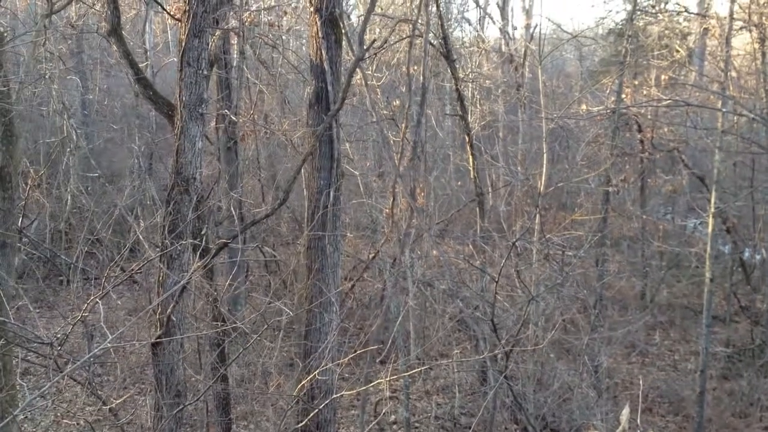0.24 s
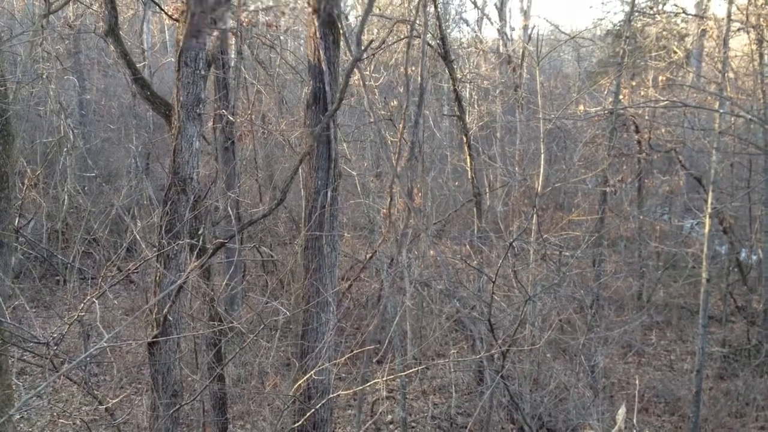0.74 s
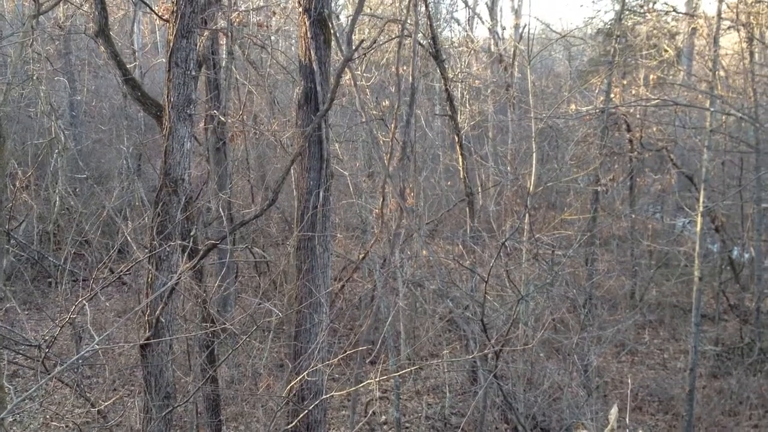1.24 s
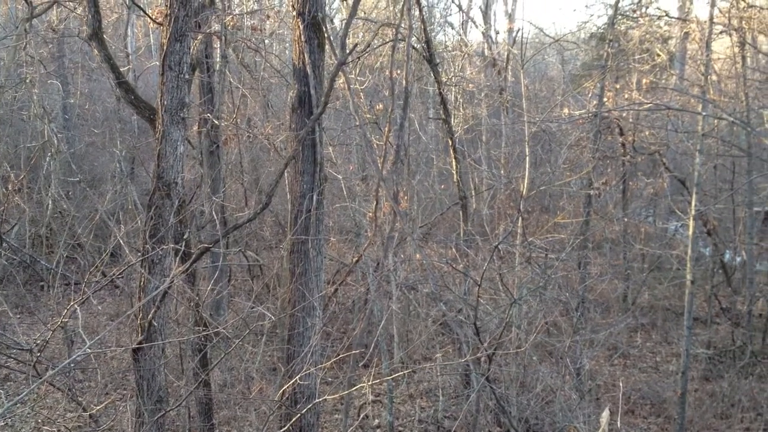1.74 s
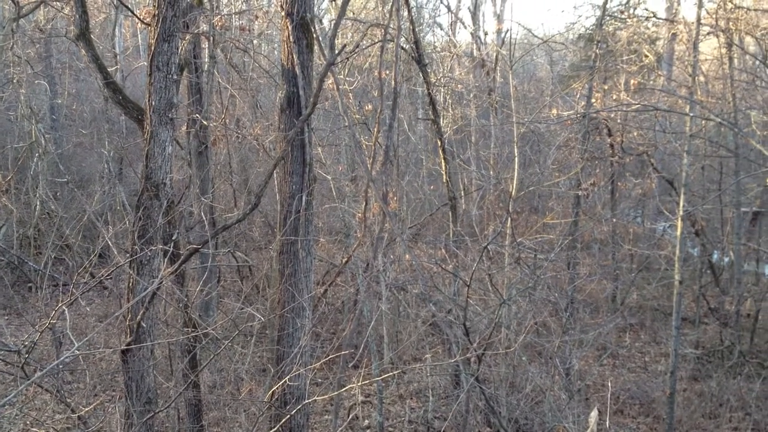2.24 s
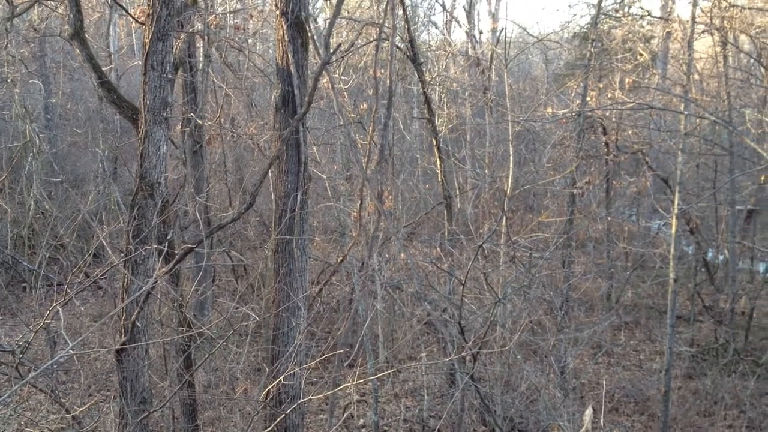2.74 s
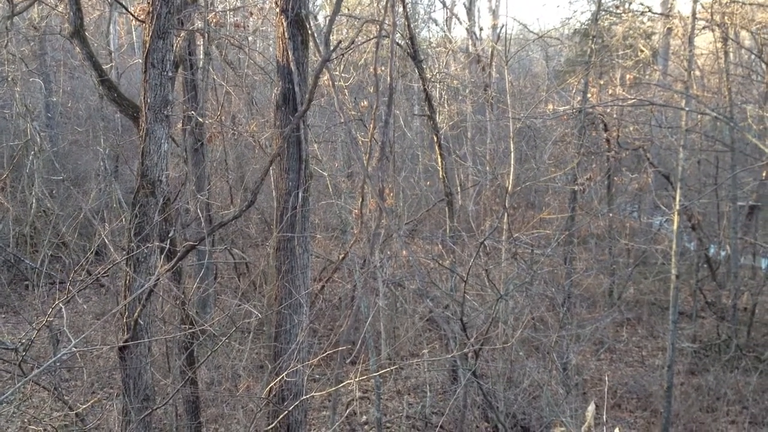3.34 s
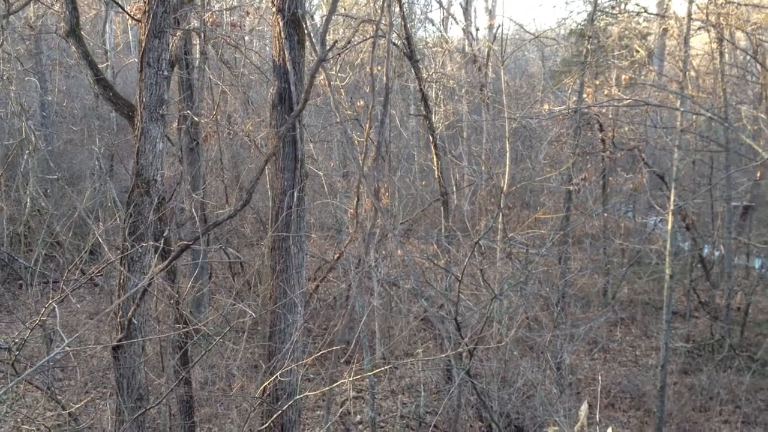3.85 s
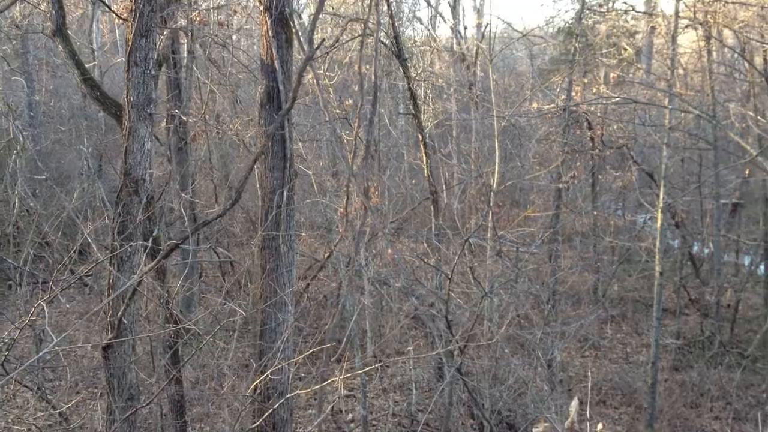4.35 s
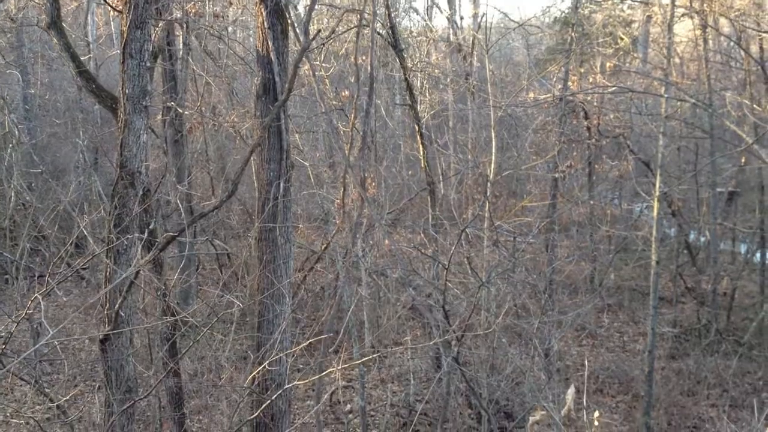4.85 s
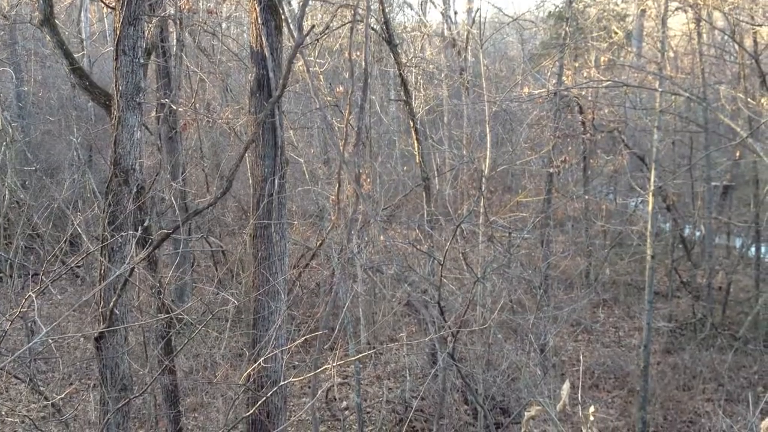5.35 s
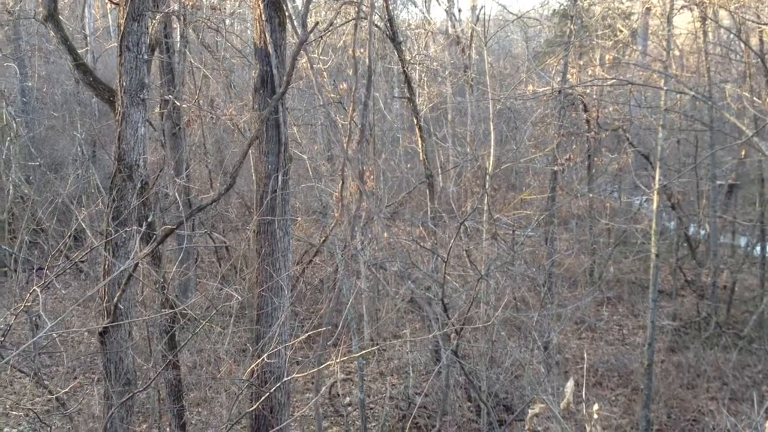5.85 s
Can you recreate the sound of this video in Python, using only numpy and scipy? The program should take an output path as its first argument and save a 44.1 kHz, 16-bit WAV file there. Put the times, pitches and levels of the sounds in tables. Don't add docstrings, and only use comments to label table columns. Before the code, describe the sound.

Outdoors in bare woods, a hound at some distance is mid-bay as the sound opens, its hoot loudest right at 0 seconds. Seven more bays follow at about 0.7, 1.4, 2.2, 2.8, 3.5, 4.2 and 5.0 seconds, each lasting roughly 0.2 seconds. Every cry begins with slight hoarse air and a quick bright upward scoop near 460 hertz, jumps to a rounder hoot near 520, then slackens, often dropping in pitch. The 2.8 bay is weak and low; the 3.5 one is highest and strong. Diffuse echoes off the trunks linger over a second, filling the gaps. Tiny high bird chips sound at 0.1, 0.5 and faintly 1.8 seconds, with another at 5.6. A dry twig ticks softly at 3.3. Faint traffic hum, gently swelling, and steady microphone hiss continue throughout, left exposed as the final echo fades by 6 seconds.

```python
import sys
import numpy as np
from scipy import signal
from scipy.fft import rfft, irfft, next_fast_len
from scipy.io import wavfile
from scipy.ndimage import uniform_filter1d

SR = 44100
rng = np.random.default_rng(int(sys.argv[2]) if len(sys.argv) > 2 else 0)


def wrap_up_sound(samples):
    columns = np.atleast_2d(samples).T
    tamed = np.clip(columns, -1, 1)
    steps = np.round(tamed * 32767).astype(np.int16)
    wavfile.write(sys.argv[1], SR, steps)


def volts_from_decibels(level):
    exponent = np.asarray(level, float) / 20
    return 10 ** exponent


N = 268128
LEAD = SR // 4


def rms_one(x):
    return x / np.sqrt(np.mean(x ** 2) + 1e-20)


def at_hz(points, hz):
    table_hz, value = np.transpose(points)
    return np.interp(np.log(np.maximum(hz, 1)), np.log(table_hz), value)


def band_pass(x, order, low_hz, high_hz):
    return signal.sosfilt(signal.butter(order, [low_hz, high_hz], "band", fs=SR, output="sos"), x)


def wobble(rate_hz):
    low_pass = signal.butter(2, rate_hz, fs=SR, output="sos")
    return rms_one(signal.sosfilt(low_pass, rng.standard_normal(N + LEAD)))


def coloured_noise(spectrum):
    size = next_fast_len(N)
    gain = volts_from_decibels(at_hz(spectrum, np.fft.rfftfreq(size, 1 / SR)))
    return rms_one(irfft(gain * rfft(rng.standard_normal(size)), size)[:N])


# start_s, scoop_s, pitch_hz, level_db, upper_partials_db
OPEN_STARTS = [
    (-.12, 0.014, 474, -40, -20.5),
    (0.674, 0.013, 461.8, -37, -21),
    (1.402, 0.048, 462.5, -39.5, -13),
    (2.16, 0.032, 451.5, -38.5, -19.5),
    (2.83, .022, 431.3, -48.5, -16),
    (3.545, 0.036, 491.3, -37.5, -15.5),
    (4.231, .055, 468.2, -40, -17.5),
    (4.956, 0.015, 461, -38.5, -19),
]
# fundamental_db, upper_drift_db, fundamental_drift_db
OPEN_COLOURS = [(2.5, -4, 1), (-1.5, -7, 7.5), (-0.7, -0.5, 8), (-5, 2.5, 2), (9, -9, -9), (5, 4, -3.5),
                (6, 7, 8), (0, 1, 6)]
# share_of_open_part, fundamental_db, octave_db, upper_db, half_line_db
OPEN_JAWS = [(0, -36.5, -22, -15, -7.5), (.25, -12.5, -10.5, -1.5, -34), (.62, -5, -7, -1, -47.5),
             (.97, -12.5, 1.5, -4, -43)]
# jaws_close_s, pitch_hz, level_db, overtones_db, half_line_db
CLOSED_HOOTS = [
    (-.055, 527, -29, 5.5, -12),
    (0.737, 522.7, -34, 5.5, 2.5),
    (1.47, 515.6, -38.5, 6.5, 5),
    (2.235, 521.4, -35.5, 12, 0),
    (2.926, 495.8, -59, 30, 27.5),
    (3.624, 536.3, -31, 5, 7.5),
    (4.323, 522.8, -32.5, -2, -5.5),
    (5.027, 519.4, -33.5, 1, -20.5),
]
# share_of_hoot, fundamental_db, octave_db, upper_db, half_line_db
CLOSED_JAWS = [(-.15, -3.5, -19, -36.5, -45), (.2, 2, -38.5, -47, -30), (.75, -1, -21.5, -51, -24.5),
               (0.998, -1, -29.5, -41.5, -28)]
# give_s, last_pitch_hz, halfway_level_db, fade_over_hoot_db
VOICE_FALLS = [
    (.04, 500.1, -45.5, -9),
    (.815, 303, -46.5, -2),
    (1.556, 337.7, -49, -2.5),
    (2.308, 308, -47, -6),
    (2.99, 389.2, -57.5, -5),
    (3.711, 523.7, -40, -13),
    (4.402, 367.6, -54.5, -0.5),
    (5.11, 292, -46, -3),
]
# fundamental_db, octave_db, upper_db, half_line_db
FALL_PARTIALS_DB = [-4.4, -13, -28.5, -13]
SCOOP_SHARE, SCOOP_HALFWAY, REST_HZ = .76, .93, 453.3
JUMP_S, HOOT_SAG = .026, .98
FALL_S, FALL_HALFWAY, FALL_FADE_DB = .056, .6, 3


def bay_stages():
    pitch, levels = [], []
    for opening, colour, hoot, fall in zip(OPEN_STARTS, OPEN_COLOURS, CLOSED_HOOTS, VOICE_FALLS):
        start_s, scoop_s, open_hz, open_db, upper_db = opening
        chest_db, upper_drift_db, chest_drift_db = colour
        close_s, hoot_hz, hoot_db, over_db, half_db = hoot
        give_s, last_hz, fall_db, fading_db = fall
        top_s, held_hz = close_s + JUMP_S, HOOT_SAG * hoot_hz

        pitch += [(start_s, SCOOP_SHARE * open_hz),
                  (start_s + scoop_s / 2, SCOOP_HALFWAY * open_hz),
                  (start_s + scoop_s, open_hz),
                  (close_s, REST_HZ),
                  (top_s, hoot_hz),
                  (give_s, held_hz),
                  (give_s + FALL_S / 2, held_hz + FALL_HALFWAY * (last_hz - held_hz)),
                  (give_s + FALL_S, last_hz)]

        drift_db = np.array([chest_drift_db, 0, upper_drift_db, 0])
        open_db = open_db + np.array([chest_db, 0, upper_db, 0])
        for share, *db in OPEN_JAWS:
            row_db = open_db + db + (share - .5) * drift_db
            levels.append((start_s + share * (close_s - start_s), *row_db))
        hoot_db = hoot_db + np.array([0, over_db, over_db, half_db])
        for share, *db in CLOSED_JAWS:
            row_db = hoot_db + db + share * fading_db
            levels.append((top_s + share * (give_s - top_s), *row_db))
        fall_db = fall_db + np.array(FALL_PARTIALS_DB)
        levels.append((give_s + FALL_S / 2, *fall_db))
        levels.append((give_s + FALL_S, *(fall_db - FALL_FADE_DB)))
    return np.array(pitch), np.array(levels)


# freq_hz, gain_db
THROAT_GAIN = [(1100, 17), (1400, 2), (1800, -4), (1950, 1), (2120, -3), (2300, -4), (2450, -12),
               (2900, -44)]
RASP_DB, JITTER = -31, .0055
GLIDE_LOSS_DB = 1.1
LOW_LOSS_DB = 22


def hound():
    pitch, rows = bay_stages()
    t = (np.arange(N + LEAD) - LEAD) / SR
    row_s = rows[:, 0]
    pitch_hz = np.interp(t, *pitch.T)
    first_db, octave_db, upper_db, half_db = [np.interp(t, row_s, column) for column in rows.T[1:]]

    rising = uniform_filter1d(np.maximum(np.gradient(np.log(pitch_hz)) * SR, 0), size=400)
    octave_db = octave_db - GLIDE_LOSS_DB * rising
    upper_db = upper_db - GLIDE_LOSS_DB * rising
    slack_db = -LOW_LOSS_DB * np.maximum(np.log2(440 / pitch_hz), 0)

    after = np.clip(np.searchsorted(row_s, t), 1, len(rows) - 1)
    voiced = (np.diff(row_s)[after - 1] < .25) & (t > row_s[0]) & (t < row_s[-1])
    gate = uniform_filter1d(voiced * 1., size=700)

    phase = 2 * np.pi * np.cumsum(pitch_hz * (1 + JITTER * wobble(60.8))) / SR
    voice = volts_from_decibels(first_db) * np.sin(phase) + volts_from_decibels(octave_db) * np.sin(2 * phase + 1)
    for multiple in range(3, 7):
        partial_db = upper_db + at_hz(THROAT_GAIN, multiple * pitch_hz) + 2.5 * wobble(40)
        voice += volts_from_decibels(partial_db) * np.sin(multiple * phase)
    voice += volts_from_decibels(half_db + 4 * wobble(40)) * np.sin(3 / 2 * phase + .9 * wobble(45))

    puffs = rng.standard_normal(N + LEAD) * (1 + np.cos(phase))
    rasp = rms_one(band_pass(puffs, 4, 600, 1700))
    voice += volts_from_decibels(np.maximum(first_db, octave_db) + RASP_DB) * rasp
    return np.sqrt(2) * volts_from_decibels(slack_db) * voice * gate


HOARSE_AIR_DB = [-36, -36, -28, -36, -20, -40, -24.5, -27]
HOARSE_EARLY_S, HOARSE_RISE_S, HOARSE_FADE_S = .021, .0089, .032


def hoarse_start():
    t, level = (np.arange(N + LEAD) - LEAD) / SR, 0
    for (start_s, _, _, bay_db, _), below_db in zip(OPEN_STARTS, HOARSE_AIR_DB):
        since_s = np.maximum(t - start_s + HOARSE_EARLY_S, 0)
        burst = (since_s / HOARSE_RISE_S) ** 2 * np.exp(-since_s / HOARSE_FADE_S * 2)
        level = level + volts_from_decibels(bay_db + below_db) * burst
    return level * rms_one(band_pass(rng.standard_normal(N + LEAD), 4, 600, 2200))


# freq_hz, t60_s
TRUNK_T60 = [(300, 1.2), (520, 1.4), (950, 1.5), (1500, 1.5), (2400, 1.2), (7500, .3)]
# freq_hz, gain_db
TRUNK_COLOUR = [(300, -4), (420, -3), (600, -2), (950, 1.5), (1500, 2), (2400, 1), (7500, 0.5)]
WOODS_DB, WOODS_BUILD_S = -4, .0041


def woods(x):
    t = np.arange(2 * SR) / SR
    white, echoes = rng.standard_normal((2, len(t))), 0
    edges_hz = 150 * 2 ** np.arange(0, 6.6, .5)
    for k, (low_hz, high_hz) in enumerate(zip(edges_hz, edges_hz[1:])):
        build = 1 - np.exp(-t / WOODS_BUILD_S * np.sqrt(low_hz / 500))
        fade = build * volts_from_decibels(-60 * t / at_hz(TRUNK_T60, np.sqrt(low_hz * high_hz)))
        band = band_pass(white[k % 2], 2, low_hz, high_hz)
        echoes = echoes + volts_from_decibels(at_hz(TRUNK_COLOUR, low_hz)) * band * fade / np.sqrt(np.sum(fade ** 2))
    return volts_from_decibels(WOODS_DB) * signal.fftconvolve(x, echoes)[:len(x)]


# start_s, peak_db, start_hz, end_hz
BIRD_CHIPS = [
    (.0945, -54, 8050, 7350),
    (.5305, -59, 7950, 7200),
    (1.7625, -63, 8250, 7450),
    (5.577, -60, 7350, 7750),
]


def bird():
    out, t = np.zeros(N + LEAD), np.arange(SR // 20) / SR
    for start_s, peak_db, start_hz, end_hz in BIRD_CHIPS:
        pitch_hz = end_hz + (start_hz - end_hz) * np.exp(-t / .005)
        shape = (1 - np.exp(-t / .002)) * np.exp(-(t / .012) ** 2)
        i = LEAD + round(start_s * SR)
        out[i:i + len(t)] += volts_from_decibels(peak_db) * shape * np.sin(2 * np.pi * np.cumsum(pitch_hz) / SR)
    return out


# start_s, peak_db, ring_hz
TWIG_TICKS = [
    (3.317, -55, 6500),
]


def twig():
    out, t = np.zeros(N), np.arange(SR // 30) / SR
    for start_s, peak_db, ring_hz in TWIG_TICKS:
        crack = band_pass(rng.standard_normal(len(t)), 2, 3500, 14000) * np.exp(-t / .01)
        ring = np.sin(2 * np.pi * ring_hz * t) * np.exp(-t / .006)
        attack = np.minimum(t / .003, 1)
        i = round(start_s * SR)
        out[i:i + len(t)] += volts_from_decibels(peak_db) * (.6 * crack + .4 * ring) * attack
    return out


# freq_hz, density_db
TRAFFIC_SPECTRUM = [(24, -42), (40, -55), (96, -12), (160, -3.5), (288, -5), (403, -12.5), (508, -1),
                    (576, -7.5), (629, -12), (807, -12.5), (914, -9.5), (1130, -14.5), (1400, -16.5),
                    (1610, -16), (2800, -25.5), (3640, -41), (6160, -120)]
# time_s, gain_db
TRAFFIC_SWELL = [(0, -1.2), (1.2, 1), (2.4, 0.4), (3.4, -1), (4.4, 1.2), (5.3, 1.1), (5.701, -0.5),
                 (6.08, -1.5)]
TRAFFIC_DB = -62.5


def traffic():
    swell_db = np.interp(np.arange(N) / SR, *np.transpose(TRAFFIC_SWELL))
    return volts_from_decibels(TRAFFIC_DB + swell_db) * coloured_noise(TRAFFIC_SPECTRUM)


# freq_hz, density_db
HISS_SPECTRUM = [(1530, -30), (2600, 0), (2800, -1), (3060, 0), (3410, -3), (3570, -2), (4680, -2),
                 (5110, -5), (7270, -7), (9200, -10), (10200, -13), (13500, -9), (15100, -8)]
HISS_DB = -69.5


def microphone_hiss():
    return volts_from_decibels(HISS_DB) * coloured_noise(HISS_SPECTRUM)


def scene():
    calls = hound() + bird()
    far = calls + woods(calls) + hoarse_start()
    return (far[LEAD:] + twig() + traffic() + microphone_hiss())[None]


def roll_off(x):
    return signal.sosfilt(signal.butter(12, 15210, fs=SR, output="sos"), x)


FADE_IN_S = .0005


def record(dry):
    faded = dry * np.minimum(np.arange(N) / SR / FADE_IN_S, 1)
    low_pass = signal.ellip(12, .5, 60, 15180, fs=SR, output="sos")
    mix = signal.sosfilt(low_pass, faded)
    return roll_off(mix)


dry = scene()
out = record(dry)
wrap_up_sound(out)
```